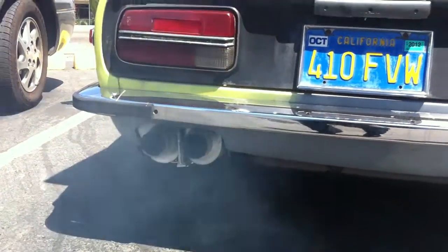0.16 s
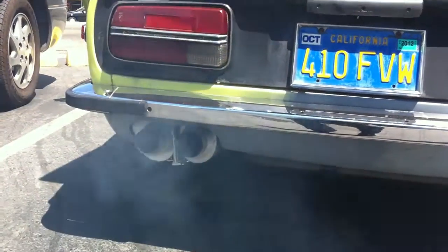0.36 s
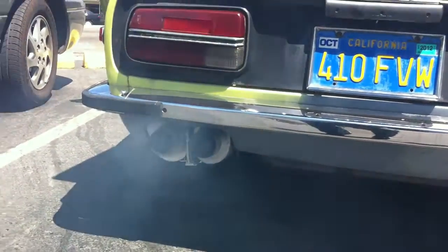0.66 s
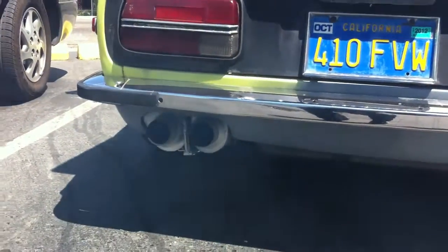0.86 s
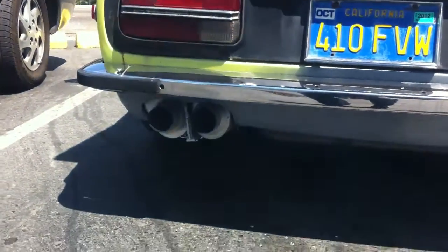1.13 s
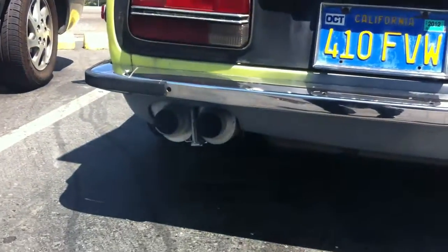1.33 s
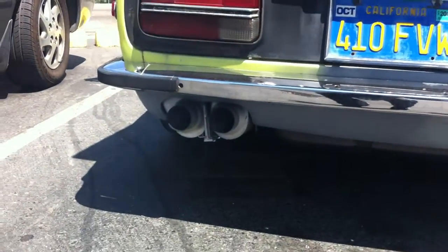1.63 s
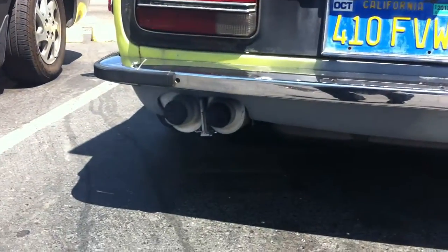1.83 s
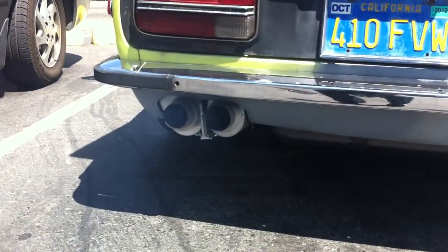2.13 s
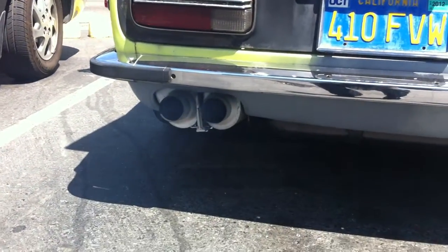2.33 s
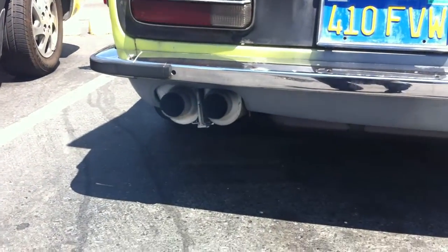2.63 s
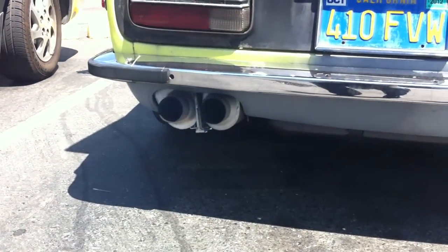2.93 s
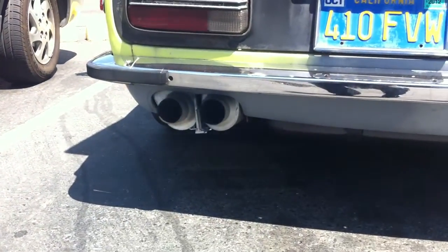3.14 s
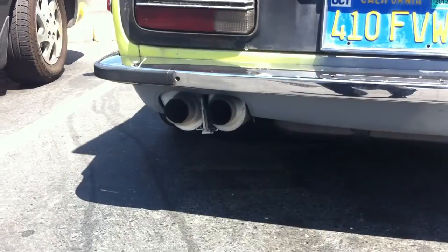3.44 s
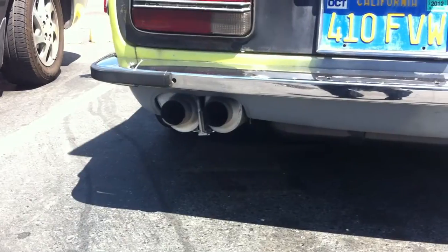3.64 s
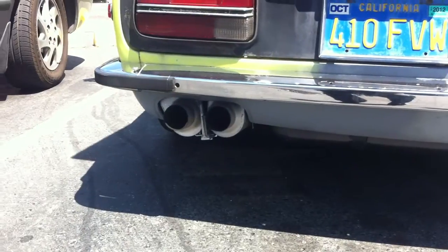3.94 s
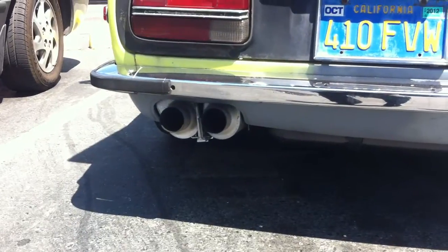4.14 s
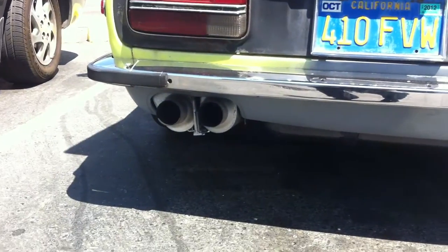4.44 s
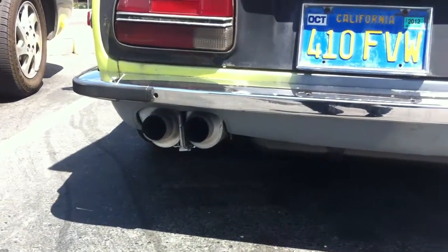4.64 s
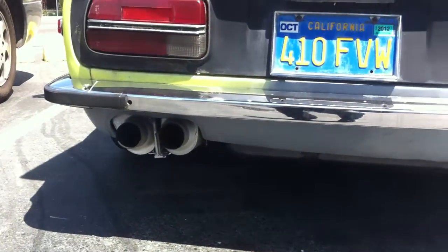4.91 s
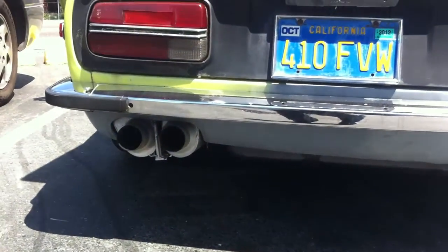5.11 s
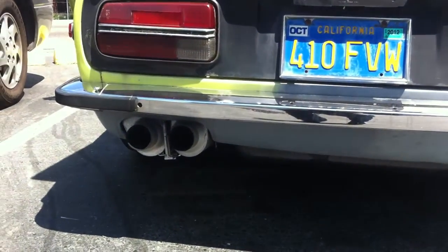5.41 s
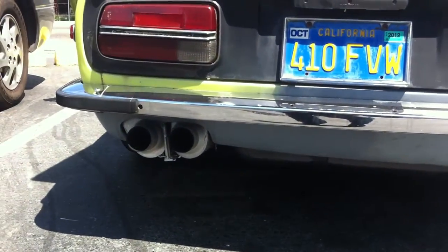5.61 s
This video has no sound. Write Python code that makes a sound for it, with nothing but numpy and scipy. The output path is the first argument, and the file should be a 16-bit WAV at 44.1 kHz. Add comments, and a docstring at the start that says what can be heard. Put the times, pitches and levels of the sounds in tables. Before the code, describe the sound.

Deep, throaty exhaust at close range, outdoors with little echo. Two short raspy revs open, the first hardest; the note drops to a loping burble with dull pops, then swells into a steadier low drone. The throttle closes and the beats slow, soften and separate near a stall before chuffing back into a rough idle. Metallic rasp and soft hiss follow the engine; a brief squeak comes last.

```python
"""V8 exhaust, revved and sagging to idle

Two blips, a held rev, then a sag into a lumpy idle, heard close behind twin tailpipes in an open lot.
One train of firings thumps through the silencer and pushes gas that rasps, rings and hisses at the steel tips.
The pipe spits now and then; a short squeak glides up and back as the engine picks up again."""
import sys
import numpy as np
from scipy import signal
from scipy.fft import rfft, irfft
from scipy.io import wavfile
from scipy.ndimage import uniform_filter1d

SR = 44100
rng = np.random.default_rng(int(sys.argv[2]) if len(sys.argv) > 2 else 0)


def wav_record(signal):
    """Record a signal, one row per channel, as 16-bit PCM in the file named by sys.argv[1]."""
    frames = np.transpose(np.atleast_2d(signal))
    bounded = np.clip(frames, -1, 1)
    # unit amplitude maps onto the largest positive 16-bit level
    quanta = np.round(bounded * 32767).astype(np.int16)
    wavfile.write(sys.argv[1], SR, quanta)


N = 254456
T = np.arange(N) / SR  # seconds

# pipe and silencer response, resonant near multiples of 83 Hz: frequency_hz, relative level_db_per_hz
SILENCER_SPECTRUM = [(25, -51.5), (52, -32), (80, -10), (105, -14.5), (135, -2), (160, 7), (205, -2.5),
                     (245, -5.5), (290, -14.5), (340, -15.5), (385, -20), (425, -31), (490, -45),
                     (1200, -86.5)]
# how hard the engine labours, in rushing and spraying gas: time_s, labour_db
LABOUR_CURVE = [(0, 5.5), (1.2, 4.5), (2.7, 6), (3.6, 7.5), (4.6, 0.5), (5.0, 8), (5.4, 8), (5.77, 7)]


def amp(db):
    """Decibels to gain."""
    return 10 ** (np.asarray(db) / 20)


def curves(rows):
    """Each column of a timed table, interpolated at every sample."""
    s, *columns = np.transpose(rows)
    return [np.interp(T, s, column) for column in columns]


def evened(x):
    """Scales the whole sound to rms 1."""
    return x / np.sqrt(np.mean(x ** 2) + 1e-20)


def steadied(x, size=3500):
    """Holds the rms near 1 all along, leaving the single beats; size is in samples."""
    power = uniform_filter1d(uniform_filter1d(x ** 2, size), size // 2)
    return x / np.sqrt(abs(power) + 1e-4 * np.mean(x ** 2))


def wander(rate_hz):
    """Smooth random drift of rms 1: noise under a Gaussian lowpass."""
    hz = np.fft.rfftfreq(N, 1 / SR)
    spectrum = rfft(rng.standard_normal(N)) * np.exp(-(hz / rate_hz) ** 2)
    return evened(irfft(spectrum, N))


def colour(x, points, size=8192):
    """Causal minimum-phase filter with the given spectrum."""
    f, db = np.transpose(points)
    hz = abs(np.fft.fftfreq(size, 1 / SR))
    log_gain = np.log(amp(np.interp(np.log(hz + 1), np.log(f), db)))
    # the Hilbert transform of the log gain supplies the minimum phase
    response = np.fft.ifft(np.exp(np.conj(signal.hilbert(log_gain)))).real
    return signal.oaconvolve(x, response[:size // 2])[:N]


def resonate(x, hz, width_hz):
    """One resonance with gain 1 at its peak."""
    return signal.lfilter(*signal.iirpeak(hz, hz / width_hz, SR), x)


def clicks(times, sizes):
    """Impulses at the given times in seconds."""
    at = np.round(np.asarray(times) * SR).astype(int)
    inside = (at >= 0) & (at < N)
    return np.bincount(at[inside], sizes[inside], N)


def firings(rate, firing_count, idle_scatter_db=3, idle_jitter_s=.002, idle_hz=80):
    """One impulse per cylinder firing; strength and timing get less even as the engine slows."""
    # cylinders in firing order, weak and strong pairs: strength_db, lateness in firing gaps
    cylinders = [(-2, .04), (-1.3, -.05), (1.8, -.02), (2.8, -.09), (-2.2, .14), (-3.8, .13), (2.2, -.08),
                 (2.6, -.06)]
    # single firings set to their own time and strength: time_s, strength_db
    lumps = [(0.115, 8), (0.365, 8), (0.717, 7.5), (0.839, 8.5), (0.973, 13.5), (1.375, 3), (1.686, 4.5),
             (1.039, 10), (3.402, 11), (3.454, 10), (3.58, 13.5), (3.696, 9), (3.787, 3.5), (3.94, 11.5),
             (4.408, 1), (4.946, 7.5), (5.224, 4), (5.5, 10)]
    scatter_db, jitter_s = 1.5, .00019
    number = np.arange(int(firing_count[-1]))
    db, late = np.transpose(cylinders)[:, number % len(cylinders)]
    times = np.interp(number + late, firing_count, T)
    idling = np.clip(3 * (1 - np.interp(times, T, rate) / idle_hz), 0, 1)
    burn, timing = rng.standard_normal((len(number), 2)).T
    db = db + burn * (scatter_db + idle_scatter_db * idling)
    times = times + timing * (jitter_s + idle_jitter_s * idling)
    for s, strength_db in lumps:
        nearest = np.argmin(abs(times - s))
        times[nearest], db[nearest] = s, strength_db
    return clicks(times, amp(db))


def effort():
    """Driving levels of note, rasp and hiss in dB: load sets them; each chuff swells, sags and dies on top."""
    # how hard the engine works: time_s, note_db, rasp_db
    load = [(0, -22.5, -50.5), (.125, -13, -28.5), (.23, -25.5, -51.5), (.5, -24, -59.5), (.65, -26, -64),
            (.7, -17.5, -47), (.76, -17, -42), (.785, -14, -30.5), (.94, -19, -49.5), (1.17, -22, -47),
            (1.29, -21.5, -55), (1.41, -18.5, -46.5), (1.62, -19, -47), (1.8, -16.5, -41), (2.33, -19, -49),
            (2.85, -16, -46), (3.28, -21, -50.5), (3.52, -21.5, -60), (4.15, -27.5, -62), (4.6, -35, -68),
            (5.05, -24, -53), (5.43, -30.5, -58), (5.77, -23.5, -52)]
    # chuffs of gas from uneven burns, crowding as the idle recovers:
    # start_s, length_s, note_db, rasp_db, hiss_db
    chuffs = [(0.578, 0.02, -25.5, -48, -70), (0.994, 0.028, -23, -37, -56.5),
              (1.065, 0.031, -17, -42, -60), (1.13, 0.036, -27, -42, -57), (2.01, 0.045, -40, -41, -60),
              (2.089, 0.043, -22, -39.5, -57.5), (4.385, 0.043, -27, -59, -70.5),
              (4.497, 0.018, -33, -58, -68), (4.65, .02, -43, -55, -70), (4.752, 0.057, -30.5, -59, -61.5),
              (4.79, 0.053, -23, -51, -63.5), (4.871, 0.052, -29, -58, -64), (4.937, 0.04, -36, -51, -61.5),
              (5.028, 0.057, -28, -49, -59), (5.126, 0.055, -30, -59, -58), (5.19, 0.027, -20, -49, -54.5),
              (5.221, 0.038, -19, -52, -56), (5.296, 0.062, -21.5, -50, -59),
              (5.465, 0.088, -24, -56, -58.5), (5.638, 0.057, -21.5, -41.5, -55),
              (5.754, .03, -22, -44, -54.5)]
    attack_s, decay_s = .008, .02
    sag_db_per_s = 108.5  # each chuff starts hard and loses pressure
    hiss_under_rasp_db, hiss_floor_db = -18.5, -78  # the floor is the idling flow
    note_db, rasp_db = curves(load)
    hiss = np.hypot(amp(rasp_db + hiss_under_rasp_db), amp(hiss_floor_db))
    power = np.array([amp(note_db), amp(rasp_db), hiss]) ** 2
    for s, length_s, *db in chuffs:
        attack = np.clip((T - s) / attack_s, 0, 1)
        swell = attack * np.exp(-np.maximum(T - s - length_s, 0) / decay_s)
        sag = amp(-sag_db_per_s * (np.clip(T - s, 0, length_s) - length_s / 2))
        power += np.outer(amp(db), swell * sag) ** 2
    return 10 * np.log10(power)


def puffs(beats, decay_s=0.04, steady=0.9):
    """Turbulent gas: a burst of noise after each firing over an even flow."""
    gust = signal.lfilter([1], [1, -np.exp(-1 / (decay_s * SR))], beats)
    return steadied((steadied(gust) + steady) * rng.standard_normal(N))


def drone(firing_count, rate, note_db, first_db=-19, pull_db=4, full_pull_hz_per_s=30, octave_db=-3,
          boom_hz=176, boom_width_hz=24, growth=0.77, full_db=-16):
    """Two wavering tones grow with load: the firing rate, and its octave as it crosses the pipe's boom."""
    phase = firing_count + .015 * wander(20)  # in cycles
    first, octave = [steadied(colour(np.cos(2 * np.pi * k * phase), SILENCER_SPECTRUM)) for k in (1, 2)]
    # the first tone is stronger while the engine speeds up
    pull = np.clip(uniform_filter1d(np.gradient(rate, T), size=9000) / full_pull_hz_per_s, 0, 1)
    in_tune = np.exp(-((2 * rate - boom_hz) / boom_width_hz) ** 2)
    slack_db = np.minimum(note_db - full_db, 0)
    first_gain = amp(first_db + pull_db * pull + growth * slack_db)
    octave_gain = amp(octave_db + 2 * slack_db) * in_tune
    return amp(note_db) * (first_gain * first + octave_gain * octave)


def exhaust_note(beats, rate, note_db, tone, boom_hz=(143, 178), boom_width_hz=20, boom_db=-9,
                 low_hz=80, low_width_hz=20, low_db=-1, bark_db=-1, full_surge_hz_per_s=250):
    """Firings ring the silencer: barking on throttle, booming and churning at low speed."""
    # broad, hard note on open throttle: frequency_hz, relative level_db_per_hz
    bark_spectrum = [(25, -25.5), (55, -20), (85, -9.5), (120, 0), (150, 5.5), (185, -3.5), (230, 1.5),
                     (280, -6.5), (340, -13), (430, -33.5), (600, -47), (1200, -73.5)]
    slowness = rate.max() / rate
    surge = uniform_filter1d(np.gradient(rate, T), size=3000)
    throttle = np.clip(surge / full_surge_hz_per_s, 0, 1)
    churn = amp(-13.5) * slowness ** 1.3
    flow = steadied(beats) + churn * puffs(beats)
    pipe = colour(flow, SILENCER_SPECTRUM)
    boom = amp(boom_db) * sum(resonate(pipe, hz, boom_width_hz) for hz in boom_hz)  # two unequal pipes
    boom += amp(low_db) * resonate(pipe, low_hz, low_width_hz)
    bark = amp(bark_db) * colour(flow, bark_spectrum)
    burble = (1 - throttle) * (pipe + (slowness - 1) * boom) + throttle * bark
    # the burble carries the power the clean tone leaves, and at least 35 % of the whole
    power = amp(note_db) ** 2
    spare = np.maximum(power - uniform_filter1d(tone ** 2, size=3000), .35 * power)
    return tone + np.sqrt(spare) * steadied(burble)


def throat(beats, note_db, hiss_db, level_db=-11):
    """Hollow rush inside the pipe, growing with both the beat and the flow."""
    # colour of the rush: frequency_hz, relative level_db_per_hz
    throat_spectrum = [(200, -36), (340, -6.5), (425, 10.5), (480, -5), (550, 0.5), (590, -11), (635, -1.5),
                       (700, -9.5), (790, -8), (1000, -16), (1300, -12.5), (2500, -56.5)]
    labour_db, = curves(LABOUR_CURVE)
    rush = steadied(colour(puffs(beats, decay_s=0.012, steady=.5), throat_spectrum))
    return amp((note_db + hiss_db) / 2 + labour_db + level_db) * rush


def steel(gas, broad_db=-8, spread=1.07):
    """Gas noise coloured by the cross modes of the tips, with dark valleys between them."""
    # cross modes of the steel tips: frequency_hz, width_hz (before spread), level_db
    tip_modes = [(1445, 40, -11), (1560, 70, -7), (1638, 60, -1), (1710, 80, -7), (1935, 65, 0),
                 (2005, 80, -3), (2110, 70, -10), (2380, 25, -15), (4175, 50, -19)]
    # broad rasp beneath the modes: frequency_hz, relative level_db_per_hz
    rasp_spectrum = [(500, -36.5), (1150, -30), (1600, -4), (2100, -17), (2600, -23.5), (3400, -19.5),
                     (5000, -36), (9000, -47.5)]
    modes = 0
    for hz, width_hz, db in tip_modes:
        once = resonate(gas, hz, spread * width_hz)
        modes = modes + amp(db) * resonate(once, hz, spread * width_hz)  # twice, for steeper skirts
    return modes + amp(broad_db) * colour(gas, rasp_spectrum)


def tips(beats, rasp_db, trim_db=-1.0):
    """Every firing rasps gas through the steel tips, some harder than others."""
    uneven = beats * amp(2.5 * np.clip(rng.standard_normal(N), -2, 2))
    gas = puffs(uneven, decay_s=.006, steady=.7)
    return amp(rasp_db + trim_db) * steadied(steel(gas))


def ring(beats, hiss_db, hz=3240, width_hz=90, over_hiss_db=1):
    """One narrow, high mode of the tips, excited by gas noise, flutters and follows the hiss level."""
    tone = resonate(resonate(puffs(beats), hz, width_hz), hz, width_hz)
    flutter = evened(amp(3 * wander(30)))
    return amp(hiss_db + over_hiss_db) * flutter * steadied(tone)


def jet(beats, hiss_db, fizz_db=-23, fizz_growth=0.18, labour_share=1.7, full_db=-50, trim_db=2.0):
    """Fast gas hisses as it leaves the pipes, and fizzes higher up when the engine labours."""
    # colour of the escaping gas: frequency_hz, relative level_db_per_hz
    hiss_spectrum = [(800, -24.5), (2600, -0.5), (4000, -1.5), (4800, -5), (5300, -1.5), (6200, -3),
                     (7200, -7.5), (9000, -13.5), (11500, -32), (15500, -38.5)]
    labour_db, = curves(LABOUR_CURVE)
    gas = puffs(beats, decay_s=0.021, steady=2.0)
    highpass = signal.butter(2, 8000, "high", fs=SR, output="sos")
    fizz = evened(signal.sosfilt(highpass, gas))
    fizz_gain = amp(fizz_db + fizz_growth * (hiss_db - full_db) + labour_share * labour_db)
    return amp(hiss_db + trim_db) * (steadied(colour(gas, hiss_spectrum)) + fizz_gain * fizz)


def lot(level_db=-62):
    """Faint, even outdoor background of coloured noise."""
    # colour of the open lot: frequency_hz, relative level_db_per_hz
    lot_spectrum = [(25, -7.5), (100, -11.5), (400, -4), (1000, -7.5), (3000, -15.5), (7000, -33.5),
                    (11000, -28.5), (16000, -34)]
    return amp(level_db) * evened(colour(rng.standard_normal(N), lot_spectrum))


def hard_puffs(level_db=8, decay_s=.005):
    """Sudden bursts of gas strike the tips and die quickly."""
    # start_s, relative strength_db
    hard_hits = [(0.0193, -21.5), (0.1142, -10.5), (0.6734, -25.5), (0.773, -10), (0.8749, -13),
                 (1.0764, -15.5), (1.2082, -28), (1.499, -21), (1.7632, -15), (2.03, -16.5), (2.714, -19.5),
                 (2.9003, -19), (4.3742, -34.5), (4.498, -27.5), (4.6562, -35), (5.1337, -25.5),
                 (5.301, -19.5), (5.4954, -19)]
    s, db = np.transpose(hard_hits)
    burst = signal.lfilter([1], [1, -np.exp(-1 / (decay_s * SR))], clicks(s, amp(db)))
    return amp(level_db) * steel(burst * rng.standard_normal(N))


def spits(decay_s=0.003, trim_db=-4, size=1500):
    """Sharp spits in the pipe: a few milliseconds of hollow, decaying crackle each."""
    # start_s, peak level_db before the trim
    spit_times = [(1.279, -40), (1.322, -34.5), (1.373, -41), (1.635, -35), (1.773, -34), (2.838, -36.5),
                  (3.093, -35), (3.582, -46), (3.942, -35), (5.029, -36), (5.198, -38), (5.643, -28)]
    # hollow colour of the crackle: frequency_hz, relative level_db_per_hz
    spit_spectrum = [(100, -5), (400, -18), (750, 11), (1050, 0), (1500, -18), (4000, -38), (12000, -40.5)]
    out = np.zeros(N + size)
    for s, db in spit_times:
        crackle = rng.standard_normal(size) * np.exp(-T[:size] / decay_s)
        burst = colour(crackle, spit_spectrum)[:size]
        out[round(s * SR):][:size] += amp(db + trim_db) * burst / abs(burst).max()
    return out[:N]


def squeak():
    """A thin sine, roughened by fast pitch jitter, that slides up and back."""
    # time_s, pitch_hz, rms level_db
    glide = [(5.58, 1290, -76), (5.605, 1460, -42.5), (5.657, 1984, -47), (5.70, 2680, -52),
             (5.725, 2820, -59), (5.77, 2020, -43)]
    hz, db = curves(glide)
    cycles = np.cumsum(hz * (1 + .04 * wander(500))) / SR
    return amp(db) * (T > glide[0][0]) * np.sqrt(2) * np.sin(2 * np.pi * cycles)


def scene():
    """One train of firings drives the steady exhaust sounds; puffs, spits and squeak have their own times."""
    # two blips, a slow climb, a sag almost to a stall, and the recovery: time_s, firing_rate_hz
    engine_speed = [(0, 59.3), (.15, 111.3), (.3, 82.7), (.5, 73.5), (.6, 65), (.68, 66.7), (.75, 87.3),
                    (.85, 102.7), (.92, 101.3), (1.1, 81.5), (1.2, 75.7), (1.5, 78.5), (1.7, 85.8),
                    (1.9, 97.8), (2.3, 115.5), (3.07, 126), (3.5, 87.5), (3.9, 60.5), (4.2, 48), (4.65, 38),
                    (5.1, 63), (5.5, 61), (5.77, 72)]
    rate, = curves(engine_speed)
    note_db, rasp_db, hiss_db = effort()
    firing_count = np.cumsum(rate) / SR
    beats = firings(rate, firing_count)
    tone = drone(firing_count, rate, note_db)
    pipe = exhaust_note(beats, rate, note_db, tone) + throat(beats, note_db, hiss_db) + spits()
    outlet = tips(beats, rasp_db) + hard_puffs() + ring(beats, hiss_db) + jet(beats, hiss_db)
    return (pipe + outlet + squeak() + lot())[None]


def record(dry, edge_hz=15800):
    """Cuts the top treble with a steep, linear-phase lowpass."""
    lowpass = signal.firwin(511, edge_hz, window=("kaiser", 9), fs=SR)
    return signal.oaconvolve(dry, lowpass[None], "same")


dry = scene()
out = record(dry)
wav_record(out)
```